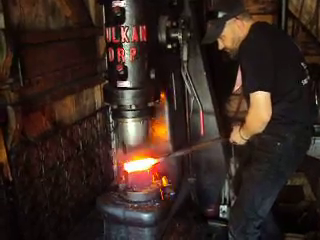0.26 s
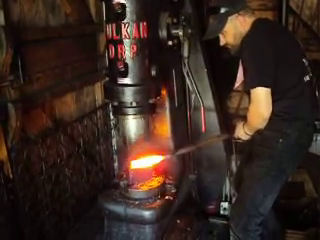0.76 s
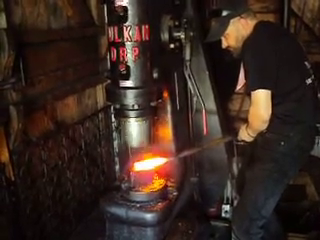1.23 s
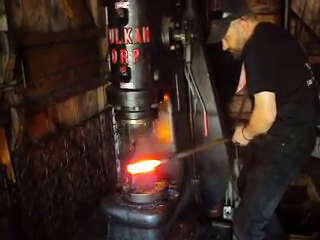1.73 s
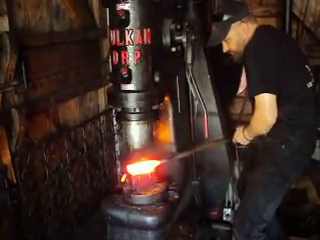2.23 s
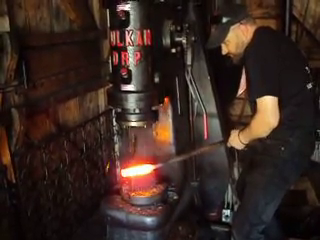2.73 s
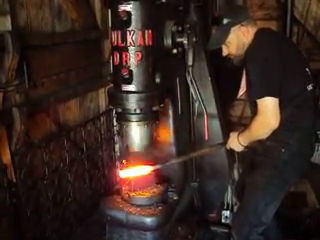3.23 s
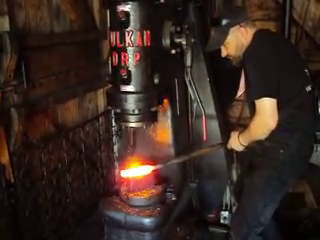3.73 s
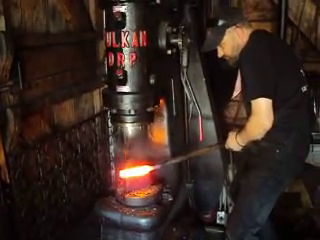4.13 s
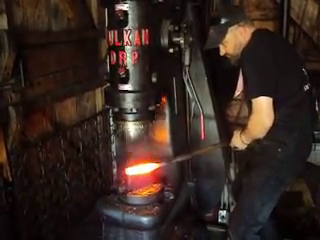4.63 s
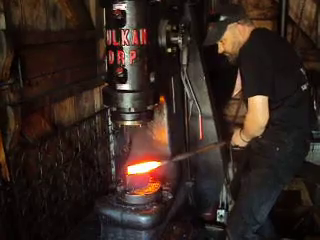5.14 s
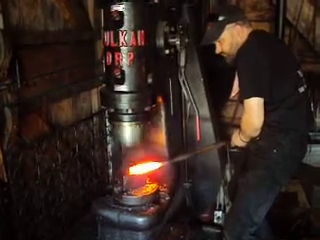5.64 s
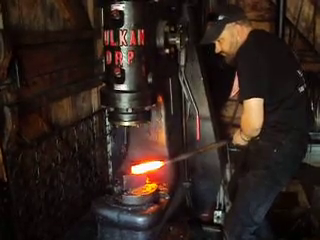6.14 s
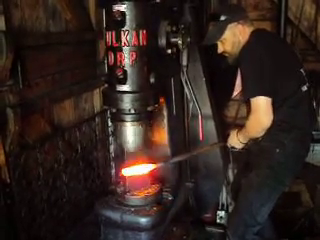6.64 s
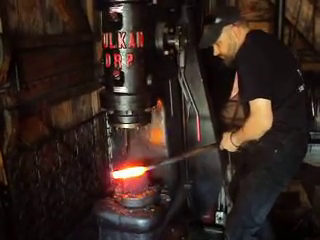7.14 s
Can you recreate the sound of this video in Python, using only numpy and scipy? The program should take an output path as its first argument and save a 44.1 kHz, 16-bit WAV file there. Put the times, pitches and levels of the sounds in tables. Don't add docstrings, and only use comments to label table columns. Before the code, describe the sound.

A powered forging hammer pounds hot steel about three times a second, each blow a thud, crack and metallic ring over steady workshop hum.

```python
import sys
import numpy as np
from scipy import signal
from scipy.fft import rfft, irfft
from scipy.io import wavfile
from scipy.ndimage import uniform_filter1d

SR = 44100
rng = np.random.default_rng(int(sys.argv[2]) if len(sys.argv) > 2 else 0)


def how_loud(loudness_db):
    steps = np.asarray(loudness_db, float) / 20
    return 10 ** steps


def pcm_store(signal):
    levels = np.round(np.clip(np.atleast_2d(signal), -1, 1) * 32767)
    wavfile.write(sys.argv[1], SR, levels.astype(np.int16).T)


N = 325458
LEAD = SR // 4
SKIP_S, SKIPPED = 4.1118, 1024
LONG = LEAD + N + SKIPPED


def evened(x):
    return x / np.sqrt(np.mean(x ** 2) + 1e-20)


def read(points, hz):
    f, value = np.transpose(points)
    return np.interp(np.log(hz + 1), np.log(f + 1), value)


def coloured(points, x):
    hz = np.fft.rfftfreq(x.shape[-1], 1 / SR)
    return evened(irfft(rfft(x) * how_loud(read(points, hz)), x.shape[-1]))


def sine(hz, t):
    return np.sin(2 * np.pi * hz * t)


def decay(db, t, t60):
    return how_loud(db - 60 * t / t60)


def workshop_time(s):
    s = np.asarray(s)
    return s + (LEAD + SKIPPED * (s > SKIP_S)) / SR


def add(mix, s, sound):
    part = mix[int(round(s * SR)):][:len(sound)]
    part += sound[:len(part)]


# f/Hz, level/dB [per Hz]
HUM = [(15, -58.5), (25, -6), (115, -4.5), (194, -7.5), (267, -3), (451, -19.5), (541, 0), (620, -17.5),
       (814, -10), (4100, -27), (5770, -46), (7500, -79), (12700, -120)]


def hum():
    waver = evened(uniform_filter1d(rng.standard_normal(LONG), size=4000))
    return how_loud(-38.0 + 1.5 * waver) * coloured(HUM, rng.standard_normal(LONG))


def rustle():
    per_s, level_db, spread_db = 350, -46.5, 5
    strength = how_loud(spread_db * np.minimum(rng.exponential(1, LONG), 5))
    strength *= rng.random(LONG) < per_s / SR
    pitches = np.geomspace(300, 3600, num=12)
    kind = rng.integers(0, len(pitches), LONG)
    t = np.arange(2048) / SR
    ticks = np.zeros(LONG)
    for k, hz in enumerate(pitches):
        tick = sine(hz, t) * how_loud(-60 * t * hz / 14 - 3.5 * np.log2(hz / 300))
        ticks += signal.oaconvolve(strength * (kind == k), tick)[:LONG]
    return how_loud(level_db) * evened(ticks)


def floor_thud(t):
    bumps = how_loud(-18.5) * sine(154, t) * decay(0, t, t60=0.042)
    bumps += how_loud(-27) * sine(330, t) * decay(0, t, t60=0.021)
    return -bumps * (1 - np.exp(-t / .0015))


# f/Hz, level/dB
CRACK = [(100, 6), (400, 2), (1500, -11.5), (2700, 1), (4070, -7.5), (5500, -7.5)]
# f/Hz, level/dB, t60/s
DIES = [
    (1210, -20, .15),
    (1540, -17, .06),
    (2190, -24, .06),
    (2560, -17, .04),
    (2820, -16, .045),
    (3430, -27, .05),
    (4070, -26, .06),
]


def cracks(t):
    burst = how_loud(-15.5) * coloured(CRACK, rng.standard_normal((len(BLOWS), len(t))))
    burst *= decay(0, t, t60=.06) * np.minimum(t / 0.00054, 1)
    rings = 0
    for hz, db, t60 in DIES:
        landing_db = 4 * rng.standard_normal((len(BLOWS), 1))
        rings = rings + decay(db + landing_db, t, t60) * sine(hz, t)
    push = how_loud(-17.0) * np.sin(np.pi * np.minimum(t / 0.0011, 1))
    return burst - np.minimum(t / 0.0028, 1) * rings - push


def die_ping(t):
    return -decay(-15, t, t60=0.014) * sine(2683, t) * np.minimum(t / 0.00091, 1)


# f/Hz, level/dB, t60/s
FOUNDATION = [
    (47.8, -30.5, 0.89),
    (67, -26.5, 0.55),
    (110, -36.5, 0.41),
]


def foundation(t):
    return sum(decay(db, t, t60) * sine(hz, t) for hz, db, t60 in FOUNDATION)


# f/Hz, level/dB, t60/s, build-up/ms, polarity
MODES_OF_BASE = [(133.8, -3.1, 0.26, 2.4, -1), (161.6, -9.8, 1.11, 60.0, 1), (165.7, -0.6, 0.63, 60.0, -1),
                 (177.9, -12.0, 1.3, 60.0, -1), (184.8, 7.0, 0.35, 60.0, -1), (193.6, -5.6, 0.7, 1.5, -1),
                 (197.8, 9.5, 0.57, 59.4, 1), (203.8, 4.2, 0.4, 60.0, 1), (214.6, -6.3, 0.85, 60.0, 1),
                 (220.1, 12.5, 0.23, 60.0, 1), (224.7, -1.3, 0.32, 1.7, -1)]
MODES_OF_ANVIL = [(242.0, 0.0, 0.2, 1.1, -1), (272.2, -12.5, 0.61, 1.0, 1), (349.0, -6.5, 0.72, 60.0, -1),
                  (383.4, -8.7, 0.48, 0.4, -1), (431.6, 7.6, 0.19, 60.0, 1), (456.0, 9.4, 0.18, 11.4, 1),
                  (502.0, -0.2, 0.24, 22.7, 1), (536.2, -3.2, 0.63, 60.0, 1), (551.1, -5.6, 0.5, 59.6, -1)]
MODES_OF_COLUMN = [(607.8, -0.4, 0.11, 0.4, -1), (644.8, 8.5, 0.16, 51.3, -1), (679.6, 17.7, 0.15, 59.9, 1),
                   (698.6, 2.7, 0.35, 1.4, -1), (700.3, 10.5, 0.26, 59.7, 1), (820.4, -6.7, 0.58, 60.0, 1),
                   (831.1, 12.0, 0.18, 60.0, 1), (840.8, 7.8, 0.25, 60.0, -1), (851.2, 7.3, 0.26, 60.0, -1),
                   (875.5, -2.8, 0.28, 12.3, -1)]
MODES_OF_FRAME = MODES_OF_BASE + MODES_OF_ANVIL + MODES_OF_COLUMN
# f/Hz, level/dB
FRAME_DB = [(40, -9.5), (100, -19), (160, -15), (200, -15.5), (280, -17.5), (450, -16), (550, -11),
            (700, -16), (850, -15.5)]
# lowest f/Hz, highest f/Hz
DAMPED_HZ = (225, 500)


def ring(t, chance, anvil_db, detune, spread_db):
    hz, db, t60, rise_ms, sign = np.transpose(MODES_OF_FRAME)[:, :, None]
    level_db = db + read(FRAME_DB, hz) + spread_db * chance[:, :1]
    level_db += anvil_db * ((hz > DAMPED_HZ[0]) & (hz < DAMPED_HZ[1]))
    swing = sine(hz * (1 + detune * chance[:, 1:]), t)
    build_up = 1 - np.exp(-t * 1000 / rise_ms)
    return (sign * decay(level_db, t, t60) * build_up * swing).sum(0)


def tongs(t, anvil_db):
    return decay(-26.0 - 1.5 * anvil_db, t, t60=.9) * (1 - np.exp(-t / 0.026)) * sine(553, t)


# f/Hz, level/dB [per Hz]
CLATTER = [(18, -54), (30, -19), (81, -13), (186, -10), (361, -13), (430, -11), (668, -9.5), (745, -10.5),
           (832, -4), (950, -15), (1040, -9.5), (3260, -27.5), (5770, -39), (7500, -71.5), (12700, -120)]
# f/Hz, t60/s
CLATTER_T60 = [(40, 0.15), (200, 0.84), (600, 0.92), (1500, 0.51), (3000, 0.56), (5500, 0.6)]
# f/Hz, likeness [0-1]
REPEAT = [(100, 0), (600, 0.65), (1500, 0.38), (4000, 0.5)]


def clatter(size, patchy_db):
    noise = rng.standard_normal((len(BLOWS) + 1, size))
    hz, t, z = signal.stft(noise, SR, nperseg=512, noverlap=384)
    same = np.clip(read(REPEAT, hz), 0, 1)[:, None]
    z = same * z[0] + np.sqrt(1 - same ** 2) * z[1:]
    patches = uniform_filter1d(rng.standard_normal(z.shape), size=9, axis=1)
    patches = evened(uniform_filter1d(patches, size=6, axis=2))
    fall_db = 60 * t / read(CLATTER_T60, hz)[:, None]
    z = z * how_loud(read(CLATTER, hz)[:, None] - fall_db + patchy_db * patches)
    out = signal.istft(z, SR, nperseg=512, noverlap=384)[1][:, :size]
    return out / out[:, :SR // 20].std()


REBOUND_HZ = (693, 794, 880)


def rebound(t, chance):
    late = np.maximum(t - .08 - .002 * chance[0], 0)
    swing = sum(sine(hz, late) for hz in REBOUND_HZ)
    return decay(-19 + 2.5 * chance[1], late, t60=0.053) * (1 - np.exp(-late / .004)) * swing


# f/Hz, level/dB
PUFF = [(200, -15), (600, 0.5), (1200, 8.5), (2400, -4.5), (3500, -13), (5500, -15)]


def upstroke_puffs(t, stroke):
    air = coloured(PUFF, rng.standard_normal((len(BLOWS), len(t))))
    opening = t - .25 - .006 * stroke[:, :1]
    shape = sum(np.exp(-((opening - late) / .016) ** 2) for late in (0, .045))
    shape = shape + .35 * (opening > 0) * (t < .34)
    turn = np.maximum(t - .225, 0)
    cushion = decay(-30.5, turn, t60=0.18) * sine(100, turn)
    return how_loud(-37 + 1.2 * stroke[:, 1:]) * shape * air + cushion


# t/s, anvil ring level/dB, crack level/dB, camera gain/dB just after the crack, gain/dB once settled
BLOWS = [(-.0795, -0.5, -5, 19, 1.5), (0.2583, 2.5, -13, -1.3, -1.5), (0.5943, 4, -2.5, -1, 0.5),
         (0.9326, 5, 1, -1.1, 7.5), (1.271, 5, 2, -1.2, -2.5), (1.611, 4.5, -3, 0.4, 2),
         (1.9501, 5, -2, -0.5, -.5), (2.29, 2.5, 1.5, 1.2, 3), (2.629, 4.5, -1, 0.5, 0.5),
         (2.9696, 3.5, 1, -2.2, 2.5), (3.3085, 0, 0, 1.2, -2), (3.649, -5, 1.5, 1.5, 0.5),
         (3.9887, -2.5, 3.5, 0.8, 7), (4.3059, -2, 5, 2.5, 2.5), (4.6471, -3, 2, 2.2, 1.5),
         (4.9934, -3, 1, -0.3, -2), (5.3357, -5, 1.5, -0.4, -2.5), (5.67, 0, 2, -1.5, -3),
         (6.0096, 5.5, -32, -2, -0.5), (6.351, 0, -1.5, 0.5, -2), (6.695, 3.5, -6.5, -3.5, -4),
         (7.034, 5.5, 0.5, -2.5, -3.5), (7.365, 5, -3, -0.6, -2)]


def hammer():
    size, out = SR // 2, np.zeros(LONG)
    t = np.arange(size) / SR
    fade = np.cos(np.pi * t / t[-1] / 2) ** .5
    tails = clatter(size, patchy_db=1.3) * (1 - np.exp(-t / 0.0032))
    crack, ping, sway, thud = cracks(t), die_ping(t), foundation(t), floor_thud(t)
    stroke = rng.standard_normal((len(BLOWS), 2))
    puffs = upstroke_puffs(t, stroke)
    chance = rng.standard_normal((len(BLOWS), len(MODES_OF_FRAME), 2))
    for k, (s, anvil_db, crack_db, *_) in enumerate(BLOWS):
        blow = ring(t, chance[k], anvil_db, detune=0.0022, spread_db=-0.88)
        blow += how_loud(-13.5) * tails[k] + sway + tongs(t, anvil_db)
        blow += how_loud(3 * stroke[k, 1]) * ping + rebound(t, stroke[k])
        blow += how_loud(crack_db) * crack[k] + puffs[k]
        add(out, workshop_time(s) - .0002, fade * blow)
        add(out, workshop_time(s) - .0092, thud)
    return out


def uneven(x):
    return x - .4 * np.tanh(x ** 2)


def rounded(x, up, down):
    limit = np.where(x > 0, up, down)
    return limit * np.tanh(x / limit)


def camera_gain():
    s, _, _, early_db, settled_db = np.transpose(BLOWS)
    late_db = 0.89 * settled_db - 0.76
    times = workshop_time(s)[:, None] + [.006, .018, .1, .22]
    values = np.transpose([np.r_[0, late_db[:-1]], early_db, settled_db, late_db])
    return how_loud(np.interp(np.arange(LONG) / SR, times.ravel(), values.ravel()))


def skip_block(x):
    cut = round(SKIP_S * SR)
    after = x[cut + SKIPPED:]
    jump = x[cut - 1] - after[0] - .22
    return np.r_[x[:cut], after + jump * np.exp(-np.arange(len(after)) / 40.)]


def scene():
    x = uneven(hammer() + hum() + rustle()) + rustle()
    x = rounded(x, up=.52, down=.75) * camera_gain()
    x = rounded(x, up=.95, down=1.05)
    x = signal.lfilter(*signal.butter(1, 22, "high", fs=SR), x)
    band_end = signal.firwin(111, 5450, window=("kaiser", 11), fs=SR)
    x = signal.oaconvolve(x, band_end, "same")[LEAD:]
    x = x - .06 * x ** 5
    return skip_block(x)[None]


def roll_off(x):
    return signal.sosfilt(signal.butter(12, 16100, fs=SR, output="sos"), x)


# t/s, level/dB
GRAZES = [
    (0.9548, -17),
    (1.2734, -25.5),
    (1.6503, -52.5),
    (2.6384, -24.5),
    (2.6608, -36.5),
    (3.3226, -40.5),
    (3.325, -30),
    (4.3073, -20.5),
    (4.3154, -37.5),
    (4.6576, -44),
]


def record(dry):
    clipped = np.clip(dry - dry.mean() + .003, -.71, .71)
    tip = np.exp(-abs(np.arange(-8, 9)) / 1.2)
    for s, db in GRAZES:
        add(clipped[0], s, how_loud(db) * tip)
    return roll_off(clipped)


dry = scene()
out = record(dry)
pcm_store(out)
```